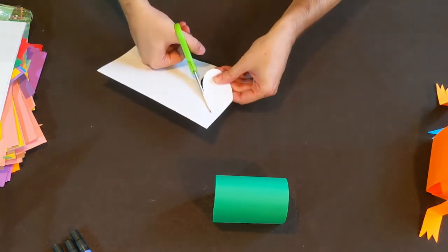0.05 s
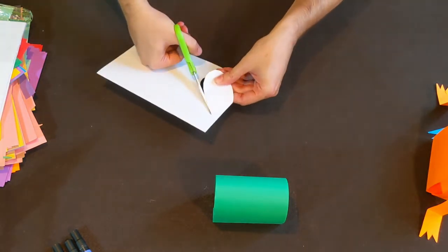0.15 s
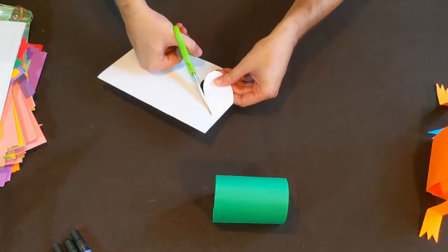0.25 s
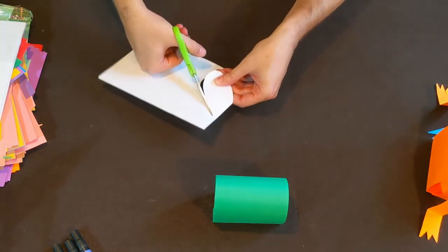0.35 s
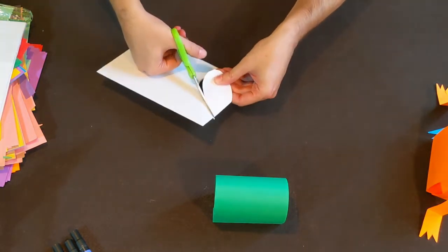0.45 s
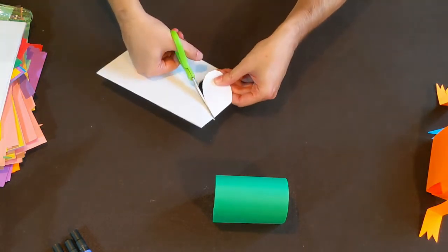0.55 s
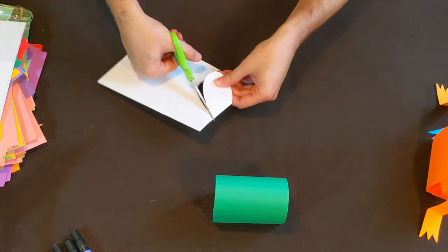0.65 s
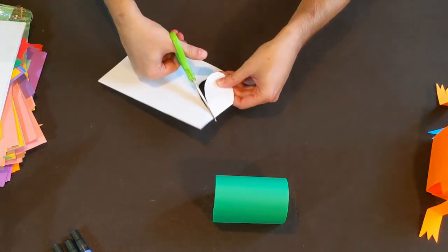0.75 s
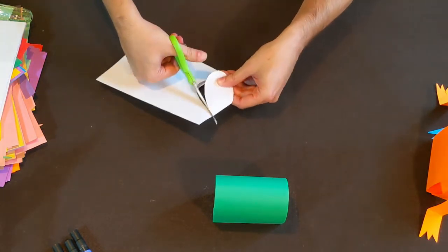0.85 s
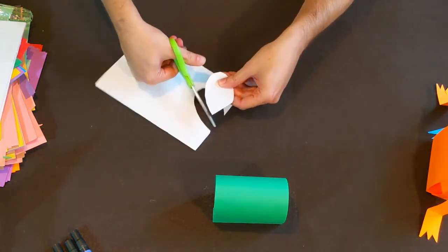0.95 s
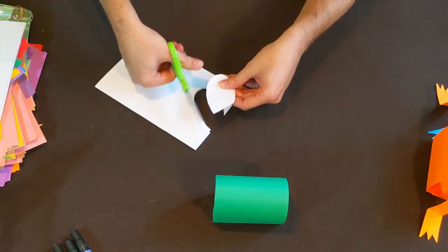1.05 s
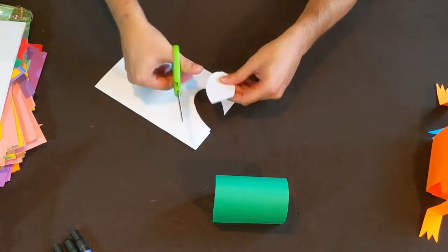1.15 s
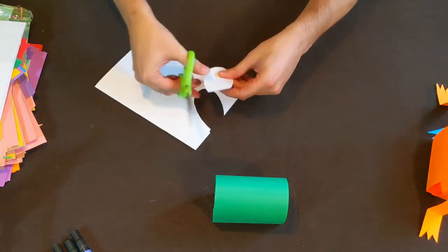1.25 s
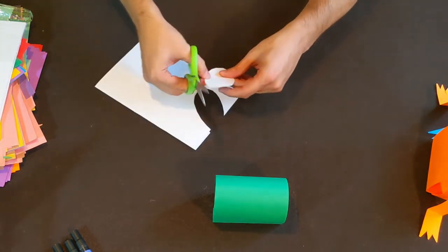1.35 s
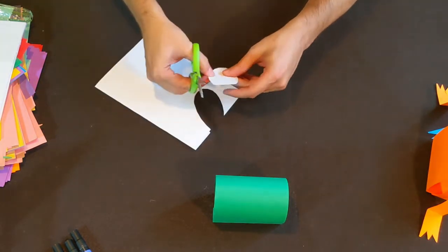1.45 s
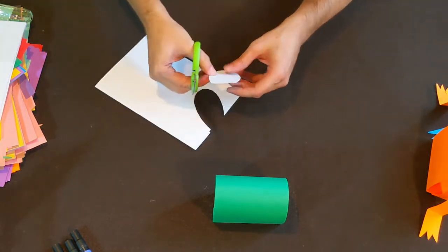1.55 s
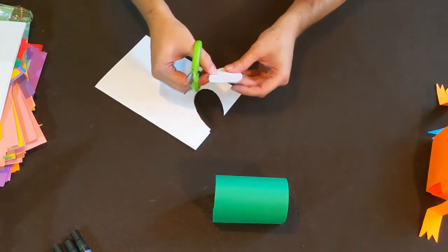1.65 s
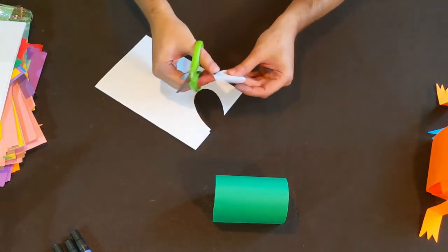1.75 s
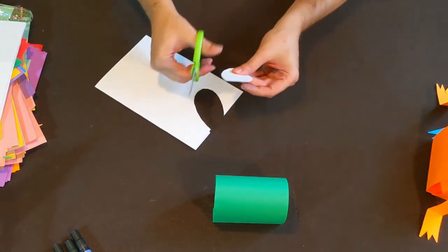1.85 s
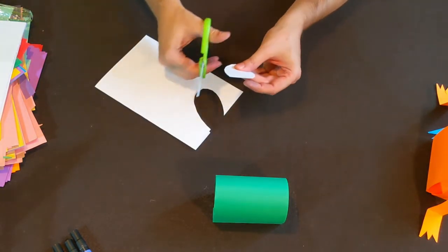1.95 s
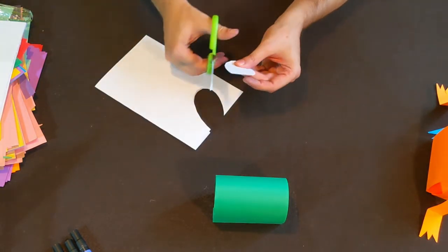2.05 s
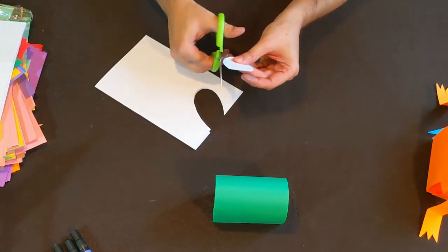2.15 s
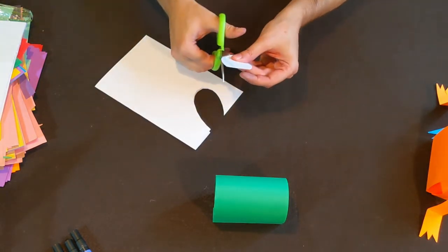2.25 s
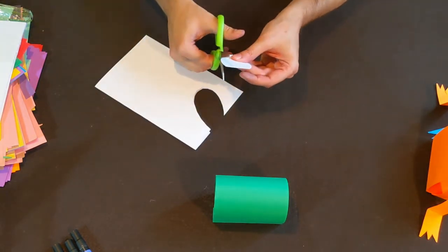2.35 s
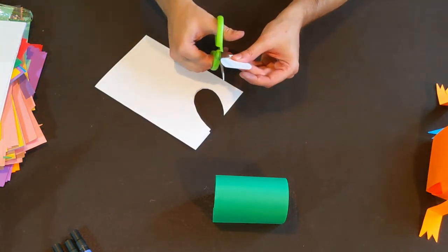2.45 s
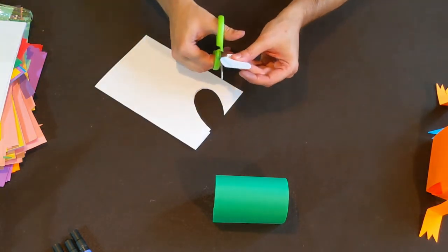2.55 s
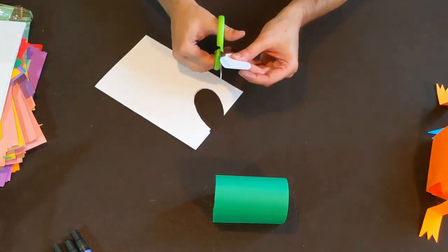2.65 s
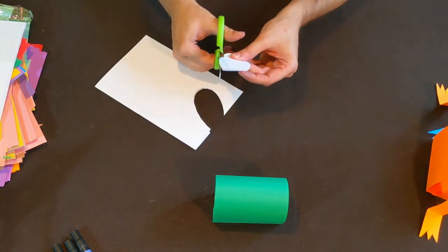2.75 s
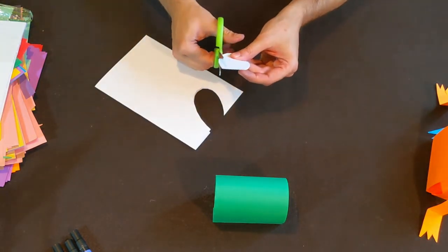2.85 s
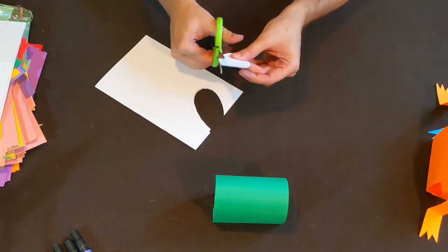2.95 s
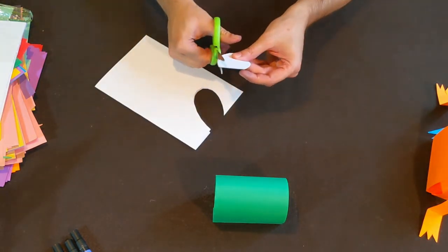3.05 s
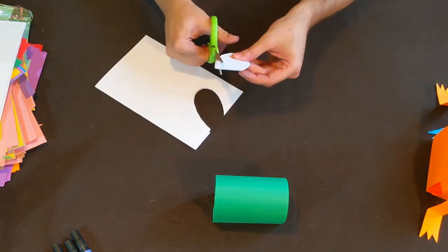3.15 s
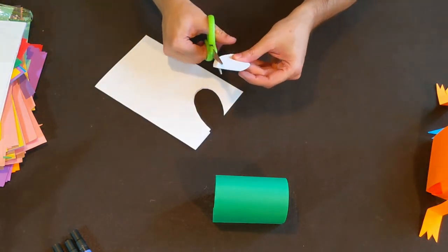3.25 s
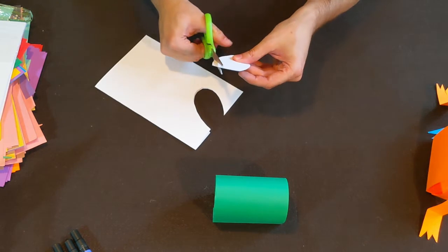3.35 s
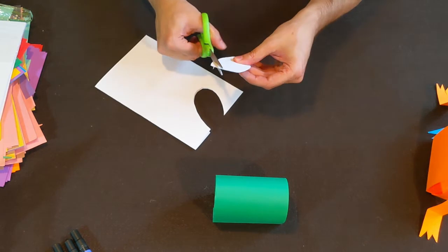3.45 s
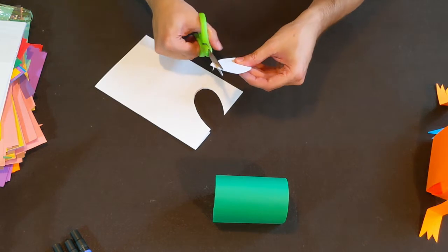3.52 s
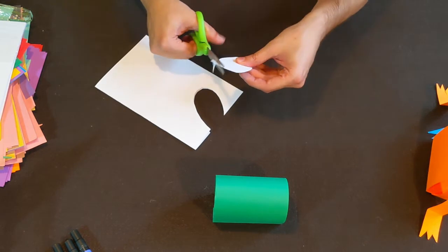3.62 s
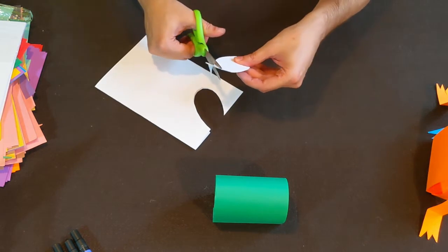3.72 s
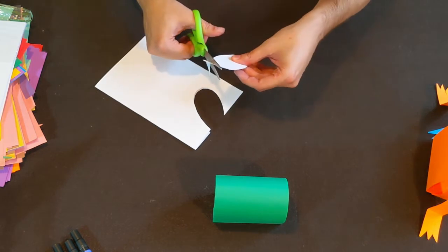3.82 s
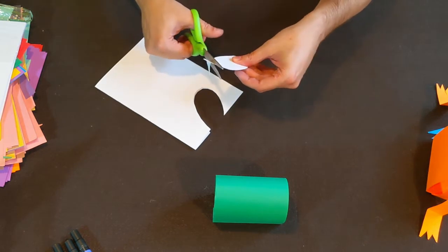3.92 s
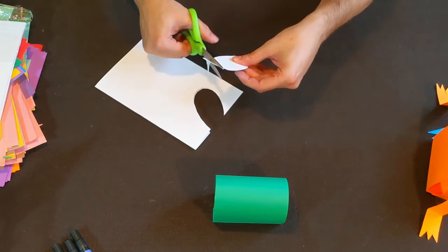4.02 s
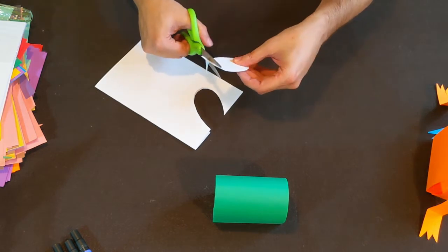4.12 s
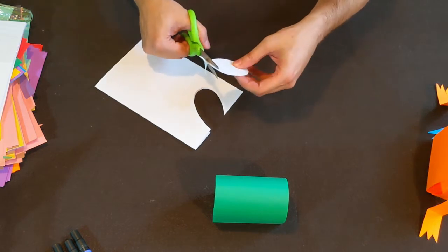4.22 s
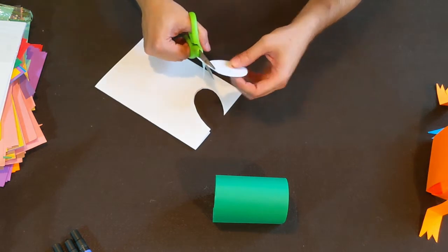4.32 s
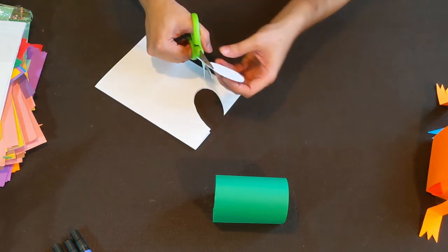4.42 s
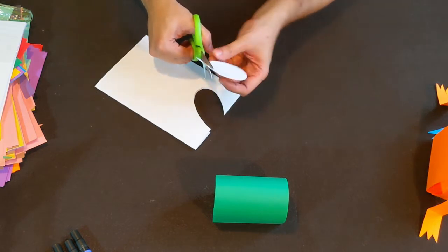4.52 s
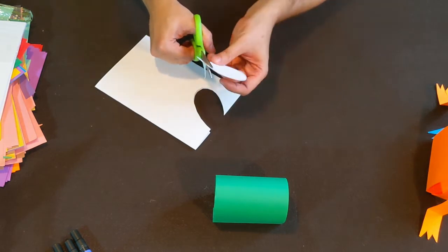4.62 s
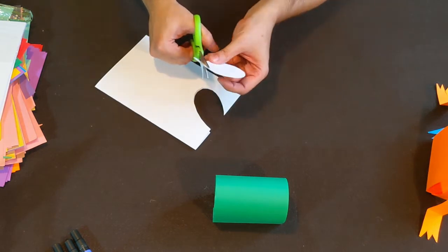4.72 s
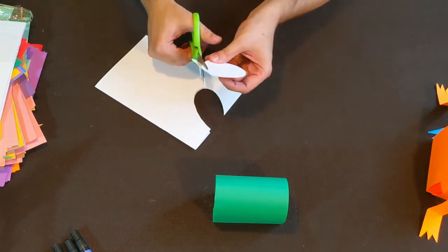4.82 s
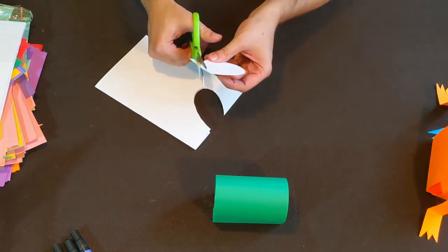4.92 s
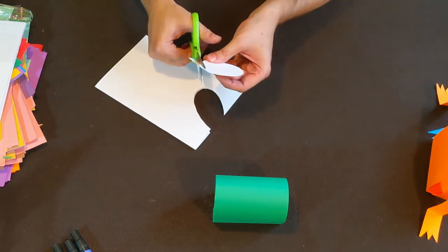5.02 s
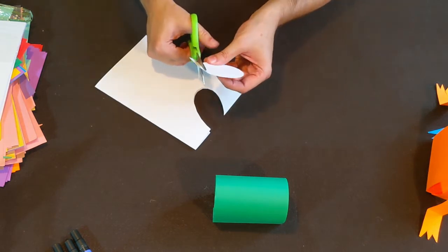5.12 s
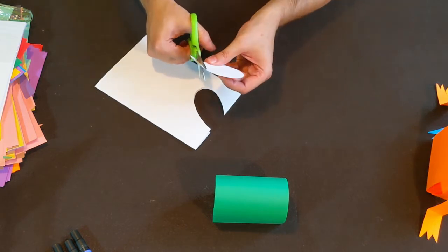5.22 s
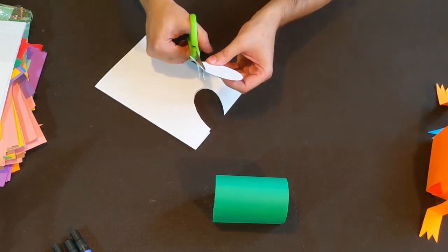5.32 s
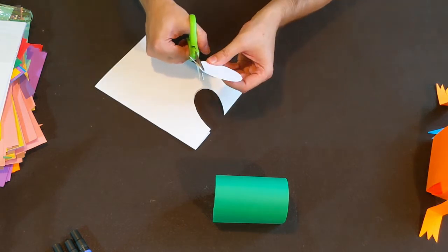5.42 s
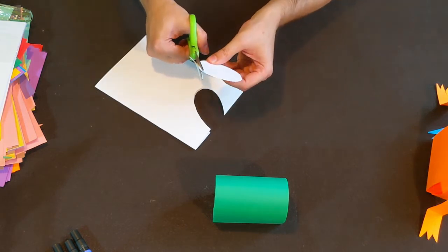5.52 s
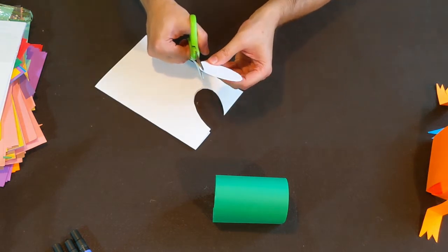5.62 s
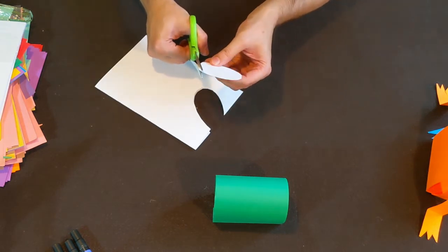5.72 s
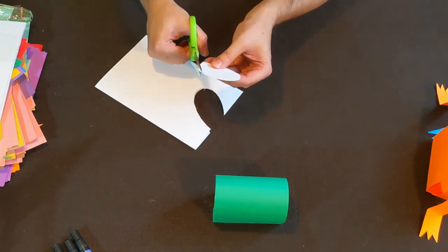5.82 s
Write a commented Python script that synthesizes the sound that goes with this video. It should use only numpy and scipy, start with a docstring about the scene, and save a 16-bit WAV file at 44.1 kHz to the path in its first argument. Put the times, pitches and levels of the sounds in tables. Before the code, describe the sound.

In a small, quiet, fairly dry room, an appliance hums and rushes softly, dipping after loud cuts. Scissors close through folded paper at once: crisp fibrous crunches with a papery thump at 0 to 0.2 s, steely scrapes around 0.4 s, more crunches at 0.56 to 0.65 s, another slide near 0.8 s, and a loud final crunch with a sharp blade clack at 0.94 s. Faint scrapes and ticks follow, a soft hollow knock at 1.4 s and a short high squeak at 1.7 s. Near quiet holds until 2.8 s, when tiny bright snips begin, growing to a clear snip and click at 3.5 s. A light slide comes at 3.7 s. From 4.1 to 5 s paper drags along a blade, thin, raspy and juddering, strongest near 4.6 s. Fine ticks continue, with a soft low puff at 5.2 s and a small closing click and faint squeak at 5.7 s.

```python
"""At a table in a small quiet room, scissors cut a shape out of folded paper.
Cuts are showers of fibre fractures that also drum on the sheet; sliding blades scrape by friction.
Faint bright snips trim the cut-out, a squeak is stick-slip, and paper drags along a blade as it is turned.
The blades snap shut, a soft knock and a low noisy puff sound; an appliance hums and rushes behind,
sinking after loud cuts.
"""
import sys
import numpy as np
from scipy import signal
from scipy.fft import rfft, irfft, next_fast_len
from scipy.io import wavfile
from scipy.ndimage import uniform_filter1d

SR = 44100
rng = np.random.default_rng(int(sys.argv[2]) if len(sys.argv) > 2 else 0)


def generate_wav(signal):
    """Clip the signal to [-1, 1] and save it as 16-bit WAV at the path in sys.argv[1]."""
    frames = np.transpose(np.atleast_2d(signal))
    scaled = np.clip(frames, -1, 1) * 32767
    pcm = np.round(scaled).astype(np.int16)
    wavfile.write(sys.argv[1], SR, pcm)


N = 258867

# Event levels are rms at full pressure, before reflections; pan_db is left over right.
# Spectra have only relative level: each coloured sound is brought to unit rms.

# appliance rush: frequency_hz, density_db (per Hz)
RUSH_SPECTRUM = [(25, -49), (90, -35), (150, -25), (190, -30), (230, -16), (330, -12), (500, -15.5),
                 (650, -19), (920, -19), (1400, -30), (2000, -29), (4900, -40.5), (7500, -48.5),
                 (15700, -56)]
# rise and fall of rush and hum, relative to its own median: time_s, level_db
BACKGROUND_SWELL = [(0.0, -45.5), (0.75, -48), (0.93, -55), (1.16, -53.5), (1.37, -48.5), (1.7, -49.5),
                    (2.17, -52.5), (3.24, -49), (3.69, -43.5), (4.38, -50), (4.74, -46.5), (5.87, -48)]
# hum lines, before waver and swell: frequency_hz, level_db (rms)
HUM_LINES = [(237, -63), (329.5, -52.5), (386, -64), (439.5, -60.5), (634, -69.5), (1781, -68)]
# likeness of the two sides of the rush: frequency_hz, coherence (0 to 1)
SIDE_COHERENCE = [(60, 0.77), (200, 0.99), (400, 0.57), (800, 0.26), (2000, 0.048), (6000, 0.059),
                  (14000, 0.13)]
# decay of the room: frequency_hz, t60_s
ROOM_DECAY = [(250, 0.18), (1000, 0.19), (3000, 0.26), (7000, 0.21), (14000, 0.17)]
# blades closing through the sheet: start_s, length_s, crunch_db, sheet_db, sheet_hz,
# tilt_db (per octave), fold_hz
CUT_EVENTS = [(-0.004, 0.015, -25, -19, 942, 0, 2600), (0.041, 0.085, -40, -35, 973, -4, 1150),
              (0.156, 0.026, -18.5, -25, 990, 0.5, 1500), (0.183, 0.024, -21, -31.5, 990, 2, 1850),
              (0.564, 0.024, -33.5, -32.5, 980, -5, 1400), (0.603, 0.024, -18.5, -26.5, 944, 3, 2200),
              (0.638, 0.02, -25, -23, 910, -1, 1850), (0.936, 0.0099, -17.5, -35, 950, 4, 2750)]
# snapping fibres: frequency_hz, density_db (per Hz)
CRUNCH_SPECTRUM = [(60, -49), (250, -35), (550, -6), (900, -6.5), (1400, -3.5), (2000, 0.5), (2900, -6.5),
                   (4000, -5), (5800, -8), (7600, -16.5), (10500, -14), (13000, -20), (16000, -30)]
# blade sliding on blade and paper: start_s, length_s, level_db, tilt_db (per octave), rasp_hz,
# pan_db, catch_db (spread of the catching)
SLIDE_EVENTS = [(0.365, 0.031, -30.5, 3, 2970, -0.5, 3.3), (0.404, 0.047, -33, 1, 2500, 3, 0),
                (0.784, 0.041, -32.5, 3, 4000, 3, 0.5), (0.835, .022, -33, 3, 4140, 5, 0),
                (1.132, 0.041, -49, 1.5, 6100, -1, -3), (1.241, 0.033, -49, -0.5, 5670, -1, 0),
                (2.241, 0.012, -58, -1.5, 2900, 1, 1.5), (3.651, 0.03, -41.5, 0.5, 4160, -3, 2),
                (3.69, 0.11, -45.5, 3.5, 4400, -2, 1), (4.149, 0.024, -48.5, 2, 5730, -3, 10),
                (5.685, 0.17, -58, 0.5, 1890, -7, 5)]
# sliding friction: frequency_hz, density_db (per Hz)
SLIDE_SPECTRUM = [(60, -45), (250, -4), (600, 4.5), (1000, 10.5), (1600, -1.5), (2500, 3), (3200, -1.5),
                  (4200, 0.5), (6000, -8.5), (7600, -11.5), (10300, -9), (13000, -20), (16000, -20.5)]
# blades snapping shut: start_s, level_db (of the crack), ring (ratio to the crack)
CLACK_EVENTS = [(0.9416, -17, 1.05), (0.951, -28, .8), (3.4904, -30.5, 0.09), (5.69, -44, .1)]
# crack of the closing blades: frequency_hz, density_db (per Hz)
CLACK_SPECTRUM = [(400, -28), (1000, -9), (3000, 7.5), (6000, 4), (8000, -13), (11000, -4.5), (16000, -9)]
# tips nibbling the cut-out: start_s, tip_db, blade_db, pan_db (of the tick), blade_hz, tick_hz
SNIP_EVENTS = [(1.142, -47, -67, -2, 6200, 10300), (1.188, -58.5, -81, -7, 6000, 12000),
               (1.494, -60.5, -67, -3, 4200, 10000), (1.563, -63, -60, -2, 3770, 10100),
               (1.759, -63, -62, -4, 5900, 10100), (1.907, -55, -63, -7.5, 3940, 10100),
               (2.808, -67, -51.5, -11, 5530, 11500), (2.828, -58.5, -46, -16, 5240, 12700),
               (2.862, -58.5, -46.5, -15, 5260, 11000), (2.879, -58, -46.5, -16, 5870, 10900),
               (2.914, -61, -51.5, -11, 5930, 13000), (2.956, -64, -58, -7, 5900, 11100),
               (3.082, -51, -44, -4, 5400, 14900), (3.113, -59, -58, -1, 5630, 14100),
               (3.216, -58, -45, -7, 5400, 12400), (3.232, -52.5, -46, -14.5, 5930, 12200),
               (3.357, -39.5, -39, -7, 5930, 12200), (3.419, -38, -41, -5.5, 5800, 12400),
               (3.488, -29.5, -34, -4, 5030, 12100), (3.659, -66, -43.5, -1, 4300, 12000),
               (4.179, -58, -69, -11, 5700, 12900), (4.245, -56.5, -53, -3, 4200, 10300),
               (4.972, -50, -51, -4, 5830, 10000), (4.986, -45, -49, 3, 6000, 14300),
               (5.177, -61, -58, -10, 5540, 14470), (5.258, -63, -52, -7, 5630, 15000),
               (5.32, -60, -55, -8, 4400, 14800), (5.346, -59, -53.5, -8, 3730, 12900),
               (5.394, -53.5, -57.5, -9, 4460, 12200), (5.512, -59, -68, -9, 4500, 12800),
               (5.545, -61, -70, -6, 4500, 12900), (5.638, -52.5, -66, -7, 5900, 12500),
               (5.688, -39.5, -51, -3.5, 4800, 10750), (5.755, -57.5, -60, -12, 5430, 13300)]
# tick at the tips: frequency_hz, density_db (per Hz)
TIP_SPECTRUM = [(3000, -44), (7500, -13), (9500, -3.5), (11000, 3), (12800, -1), (14000, 1), (16000, -15)]
# body of the blade ring: frequency_hz, density_db (per Hz)
BLADE_SPECTRUM = [(80, -52), (300, -14), (1000, -7.5), (2000, -10), (2800, -12.5), (3600, -13), (4200, 1.5),
                  (5200, -29.5), (6200, 4), (7300, -64), (10000, -42)]
# rubbing and sticking: start_s, length_s, pitch_hz, squeak_db, rub_db, grit (ratio to the tone)
SQUEAK_EVENTS = [(1.707, 0.0027, 2486, -25, -37, .1), (1.72, 0.016, 2581, -23, -42.5, 0.063),
                 (2.322, 0.013, 2700, -61, -55, 0.92), (2.424, 0.023, 2363, -57.5, -63, 1.1),
                 (5.686, 0.032, 2014, -50.5, -56, .7)]
# dull rub under a squeak: frequency_hz, density_db (per Hz)
RUB_SPECTRUM = [(60, -47), (130, -13.5), (230, 3.5), (550, 9.5), (1200, 1), (1800, -14.5), (3300, -38),
                (4300, -10.5), (5500, -35), (12000, -45)]
# turn of the dragging cut-out, before judder: time_s, upper_db, lower_db, lower_hz
DRAG_COURSE = [(4.071, -95, -88, 3300), (4.13, -61, -57.5, 3400), (4.18, -62, -55, 3780),
               (4.228, -62, -66, 3800), (4.243, -50, -67, 3800), (4.32, -59.5, -61, 3750),
               (4.41, -51.5, -56, 3750), (4.555, -59, -48.5, 3680), (4.583, -56, -45, 3650),
               (4.594, -44, -32.5, 3660), (4.645, -49, -43, 3700), (4.70, -51, -43.5, 3680),
               (4.754, -50, -41, 3630), (4.81, -53, -43.5, 3470), (4.835, -59, -51.5, 3500),
               (4.95, -62, -58.5, 3450), (5.22, -76, -63.5, 3450), (5.5, -88, -79, 3450)]
# rasp of the drag: frequency_hz, density_db (per Hz)
DRAG_SPECTRUM = [(100, -55), (900, 3.5), (1700, -1), (2550, 2.5), (3200, 3), (4150, -11), (4750, -20),
                 (5700, -5), (6600, -16), (9000, -16), (15000, -31)]
# soft noisy puff: frequency_hz, density_db (per Hz)
PUFF_SPECTRUM = [(30, -27), (90, -19), (140, 1), (200, -12), (450, -0.5), (620, -9), (820, -7.5),
                 (1500, -20), (3000, -24), (6000, -32), (12000, -54)]

# scatter off table and hands: (level over the direct sound dB, t60 s)
CUT_SCATTER, SNIP_SCATTER, SQUEAK_SCATTER = (4.6, 0.014), (3.3, 0.021), (-0.5, 0.13)
# wall tails over the direct sound
CUT_ROOM_DB, SNIP_ROOM_DB, SQUEAK_ROOM_DB = -7, -0.5, -12.5
CUTOFF_HZ = 15780
RUSH_DB = -50.0
# every cut: the edges graze the paper, bite, then run out; levels are relative to the bite
GRAZE_S, GRAZE_DB = 0.011, -10
BITE_RISE_S, BITE_FALL_S, BITE_FADE_DB = 0.006, 0.017, -3.5
RUN_OUT_DB, RUN_OUT_FALL_S = -5.5, 0.025
# the fold colours the crunch with a broad resonance; fibres give way in bunches
FOLD_SHARE, FOLD_WIDTH_HZ = 0.37, 2140
BUNCH_DB, BUNCHES_PER_S = 2.4, 550
RASP_WIDTH_HZ, RASP_SHARE = 830, 0.37
SLIDE_RISE_S, SLIDE_FADE_DB = 0.013, -1.5
# every slide trails off in a duller rub, its level relative to the slide
TRAIL_DB, TRAIL_FALL_S, TRAIL_TILT_DB = -9.5, 0.079, -2
CLACK_LENGTH_S, CLACK_RING_HZ, CLACK_WIDTH_HZ = 0.0017, 2900, 290
# the stiff little cut-out gives each tick a resonance
TICK_SHARE, TICK_WIDTH_HZ = 0.93, 2000
# the two blades ring a little apart, this share either side of the ring pitch
BLADE_SPLIT, RING_WIDTH_HZ, RING_SHARE = 0.061, 780, 1.3
KNOCK_S, KNOCK_HZ, KNOCK_DB = 1.393, 635, -42.5
KNOCK_RISE_S, KNOCK_HOLD_S, KNOCK_FALL_S = 0.0069, 0.024, 0.031
# a squeak is unsteady in pitch (as a share of it) and in level
SQUEAK_JITTER, JITTERS_PER_S = 0.03, 900
SQUEAK_SHUDDER_DB, SHUDDERS_PER_S = 2.0, 330
SQUEAK_WIDTH_HZ, GRIT_WIDTH_HZ = 560, 950
# the upper drag resonance sinks, the lower one carries an overtone, both waver
DRAG_UPPER_HZ, DRAG_SAG_HZ_PER_S, DRAG_WAVER_HZ = 4180, 240, 60.2
DRAG_UPPER_WIDTH_HZ, DRAG_LOWER_WIDTH_HZ = 380, 540
DRAG_OVERTONE_RATIO, DRAG_OVERTONE_DB = 1.55, -19.5
DRAG_RASP_DB, JUDDER_DB, JUDDERS_PER_S = 2.5, 2.5, 120
PUFF_S, PUFF_LENGTH_S, PUFF_DB = 5.225, 0.067, -43


def from_db(db):
    """Decibel law: amplitude gain grows tenfold every 20 dB."""
    return 10 ** (np.asarray(db) / 20)


def rms_one(x):
    """Normalisation: scale to unit rms."""
    return x / np.sqrt(np.mean(x ** 2) + 1e-20)


def at_hz(points, hz):
    """Interpolation of a table on a log-frequency axis."""
    f, value = np.transpose(points)
    return np.interp(np.log(np.maximum(hz, 1)), np.log(f), value)


def bins(x):
    """Frequencies of the discrete spectrum of x, in Hz."""
    return np.fft.rfftfreq(x.shape[-1], 1 / SR)


def colour(x, spectrum, tilt_db=0):
    """Linear filtering: weight x by a spectrum, tilted per octave above 500 Hz; rms 1."""
    hz = np.maximum(bins(x), 1)
    weight_db = at_hz(spectrum, hz) + tilt_db * np.log2(np.maximum(hz, 500))
    return rms_one(np.fft.irfft(rfft(x) * from_db(weight_db), x.shape[-1]))


def resonate(x, hz, width_hz):
    """Damped oscillator: a pole pair whose radius sets the bandwidth."""
    r = np.exp(-np.pi * width_hz / SR)
    return signal.lfilter([1, 0, -1], [1, -2 * r * np.cos(2 * np.pi * hz / SR), r * r], x)


def band(x, hz, width_hz):
    """Cascaded resonance: two equal oscillators give steep skirts; rms 1."""
    return rms_one(resonate(resonate(x, hz, width_hz), hz, width_hz))


def moving_resonance(hz, width_hz):
    """Narrow-band noise: a carrier following hz, with random slow quadratures; rms 1."""
    phase = 2 * np.pi * np.cumsum(hz) / SR
    return rms_one(drift(width_hz, N) * np.cos(phase) + drift(width_hz, N) * np.sin(phase))


def drift(rate, size):
    """Slow random fluctuation: straight lines between normal draws, rate of them per second."""
    steps = np.arange(size) * rate / SR
    return np.interp(steps, np.arange(size), rng.standard_normal(size))


def grains(per_s, spread_db, size=8192):
    """Shot noise: tiny impulses at random moments, with random signs and strengths."""
    born = rng.random(size) < per_s / SR
    sign = rng.choice([-1, 1], size)
    strength = from_db(spread_db * np.minimum(rng.exponential(1, size), 4))
    return born * sign * strength


def stroke(length, rise, fall, fade_db=0, size=8192):
    """Pressure envelope: it builds, changes by fade_db over its length, then decays exponentially."""
    t, length = np.arange(size) / SR, max(length, 0.001)
    building = np.sin(np.pi / 2 * np.minimum(t / rise, 1)) ** 2
    holding = from_db(fade_db * np.minimum(t / length, 1))
    return building * holding * np.exp(-np.maximum(t - length, 0) / fall)


def pressed(sound, press, level_db):
    """Amplitude modulation by pressure, with the given rms level at full pressure."""
    return from_db(level_db) * rms_one(sound * press) * np.sqrt(np.mean(press ** 2))


def add(track, s, sound, pan_db=0):
    """Superposition: sum a sound into the stereo track at time s, panned by level difference."""
    start = round(s * SR)
    first, last = max(start, 0), min(start + sound.shape[-1], N)
    track[:, first:last] += sound[:, first - start:last - start] * from_db([[pan_db / 2], [-pan_db / 2]])


def with_direct(echoes):
    """Interference: direct sound plus echoes ripple the spectrum but keep its broad balance."""
    size = echoes.shape[-1]
    ripple = 1 + rfft(echoes)
    broad_power = uniform_filter1d(np.abs(ripple) ** 2, size=size // 110, axis=1)
    ending = np.minimum(np.linspace(4, 0, size), 1) ** 2   # fades the last quarter
    return irfft(ripple / np.sqrt(broad_power)) * ending


def scatter(sound, near, size=8192):
    """Early reflection off table and hands: decaying echoes, new for each side and each call."""
    near_db, t60 = near
    decay = from_db(-60 * np.arange(size) / SR / t60)
    echoes = rms_one(rng.standard_normal((2, size)) * decay)
    response = with_direct(from_db(near_db) * echoes / np.sqrt(size))
    return signal.fftconvolve(sound[None], response, axes=1)


def room(x, tail_db, size=22050):
    """Reverberation: diffuse noise whose bands each decay exponentially at their own rate."""
    t = np.arange(size) / SR
    white = rng.standard_normal((2, size))
    centres, tail = np.array(ROOM_DECAY)[:, 0], 0
    for hz, t60 in ROOM_DECAY:
        share = at_hz(np.c_[centres, centres == hz], bins(white))
        tail = tail + irfft(rfft(white) * share) * from_db(-60 * t / t60)
    tail = rms_one(tail * np.minimum(t / 0.00065, 1))
    response = with_direct(from_db(tail_db) * tail / np.sqrt(size))
    return signal.fftconvolve(x, response, axes=1)[:, :N]


def background():
    """Partial coherence: a two-sided rush and wavering hum, whose set level sinks after loud cuts."""
    level_db = np.interp(np.arange(N) / SR, *np.transpose(BACKGROUND_SWELL))
    swell = from_db(level_db - np.median(level_db))
    white = rng.standard_normal((2, next_fast_len(N, True)))
    mid, side = rfft(white)
    alike = np.clip(at_hz(SIDE_COHERENCE, bins(white)), 0, 1)
    both_sides = np.sqrt(1 + alike) * mid + np.sqrt(1 - alike) * side * [[1], [-1]]
    rush = colour(irfft(both_sides), RUSH_SPECTRUM)[:, :N]
    hum = 0
    for hz, line_db in HUM_LINES:
        phase = 2 * np.pi * np.cumsum(hz + 1.49 * drift(12, N)) / SR
        hum = hum + np.sqrt(2) * from_db(line_db + 2.7 * drift(9, N)) * np.sin(phase)
    return swell * (from_db(RUSH_DB) * rush + hum)


def cuts():
    """Fracture noise: fibres snap in bunches, and the same jolts excite resonances of the sheet."""
    out = np.zeros((2, N))
    for s, length, crunch_db, sheet_db, sheet_hz, tilt_db, fold_hz in CUT_EVENTS:
        fibres = grains(per_s=7300, spread_db=2.5)
        fibres = fibres * from_db(BUNCH_DB * drift(BUNCHES_PER_S, len(fibres)))
        bite = stroke(length, BITE_RISE_S, BITE_FALL_S, BITE_FADE_DB)
        run_out = from_db(RUN_OUT_DB) * stroke(length, BITE_RISE_S, RUN_OUT_FALL_S)
        press = np.maximum(bite, run_out)
        fold = band(fibres, fold_hz, FOLD_WIDTH_HZ)
        crunch = colour(fibres, CRUNCH_SPECTRUM, tilt_db) + FOLD_SHARE * fold
        crunch = pressed(crunch, press, crunch_db)
        drumming = rms_one(resonate(resonate(fibres, sheet_hz * 0.9, 230), sheet_hz * 0.99, 320))
        overtone = band(fibres, sheet_hz * 1.207, 187)
        sheet = pressed(drumming + 0.23 * overtone, bite, sheet_db)
        graze = colour(grains(per_s=5000, spread_db=-11.5), CRUNCH_SPECTRUM, tilt_db)
        graze = pressed(graze, stroke(GRAZE_S, GRAZE_S, BITE_FALL_S), crunch_db + GRAZE_DB)
        add(out, s - GRAZE_S, scatter(graze, CUT_SCATTER))
        add(out, s, scatter(crunch + sheet, CUT_SCATTER), pan_db=2.0)
    return out


def slides():
    """Sliding friction: asperities of steel and paper catch, rasp at one pitch and trail off dully."""
    out = np.zeros((2, N))
    for s, length, level_db, tilt_db, rasp_hz, pan_db, catch_db in SLIDE_EVENTS:
        asperities = grains(per_s=9000, spread_db=0.5)
        asperities = asperities * from_db(catch_db * drift(185, len(asperities)))
        rasp = band(asperities, rasp_hz, RASP_WIDTH_HZ)
        press = stroke(length, rise=SLIDE_RISE_S, fall=0.016, fade_db=SLIDE_FADE_DB)
        scrape = colour(asperities, SLIDE_SPECTRUM, tilt_db) + RASP_SHARE * rasp
        scrape = pressed(scrape, press, level_db)
        trail = colour(grains(per_s=7000, spread_db=5.5), SLIDE_SPECTRUM, TRAIL_TILT_DB)
        trail_press = stroke(0.016, rise=0.0051, fall=TRAIL_FALL_S)
        trail = pressed(trail, trail_press, level_db + TRAIL_DB)
        add(out, s, scatter(scrape, CUT_SCATTER), pan_db)
        add(out, s + length, scatter(trail, CUT_SCATTER))
    return out


def closing():
    """Impact: the blades snap shut in a dry crack that excites a brief ring of the steel."""
    out = np.zeros((2, N))
    for s, level_db, ring in CLACK_EVENTS:
        crack = colour(grains(per_s=12000, spread_db=8.5), CLACK_SPECTRUM)
        crack = pressed(crack, stroke(CLACK_LENGTH_S, rise=0.0003, fall=0.0008), level_db)
        steel = band(crack, CLACK_RING_HZ, CLACK_WIDTH_HZ) * crack.std()
        add(out, s, scatter(crack + ring * steel, SNIP_SCATTER))
    return out


def snips():
    """Impulse excitation: fibres snapping at the tips tick brightly and ring both blades briefly."""
    out = np.zeros((2, N))
    press = stroke(0.0083, rise=0.0016, fall=0.0055, fade_db=2.5)
    for s, tip_db, blade_db, pan_db, blade_hz, tick_hz in SNIP_EVENTS:
        fibres = grains(per_s=2200, spread_db=0.0)
        tick = colour(fibres, TIP_SPECTRUM) + TICK_SHARE * band(fibres, tick_hz, TICK_WIDTH_HZ)
        lower_blade = band(fibres, blade_hz * (1 - BLADE_SPLIT), RING_WIDTH_HZ)
        upper_blade = band(fibres, blade_hz * (1 + BLADE_SPLIT), RING_WIDTH_HZ)
        blades = rms_one(lower_blade - upper_blade)
        ring = colour(fibres, BLADE_SPECTRUM) + RING_SHARE * blades
        add(out, s, scatter(pressed(tick, press, tip_db), SNIP_SCATTER), pan_db)
        add(out, s, scatter(pressed(ring, press, blade_db), SNIP_SCATTER), pan_db=-0.5)
    return out


def knock():
    """Single mode of vibration: a soft hollow knock as the hand turns the scissors over."""
    out = np.zeros((2, N))
    press = stroke(KNOCK_HOLD_S, KNOCK_RISE_S, KNOCK_FALL_S)
    note = np.sin(2 * np.pi * KNOCK_HZ * np.arange(len(press)) / SR)
    contact = colour(grains(per_s=4500, spread_db=-5.0), SLIDE_SPECTRUM, tilt_db=-2.0)
    add(out, KNOCK_S, pressed(note + 0.27 * contact, press, KNOCK_DB)[None])
    return out


def squeaks():
    """Stick-slip friction: an unsteady tone with grit, over a dull rub."""
    out = np.zeros((2, N))
    for s, length, hz, squeak_db, rub_db, grit in SQUEAK_EVENTS:
        press = stroke(length, rise=0.002, fall=0.003)
        pitch_hz = hz * (1 + SQUEAK_JITTER * drift(JITTERS_PER_S, len(press)))
        shudder = from_db(SQUEAK_SHUDDER_DB * drift(SHUDDERS_PER_S, len(press)))
        tone = np.sin(2 * np.pi * np.cumsum(pitch_hz) / SR) * shudder
        gritty = band(grains(per_s=3900, spread_db=-6.0), hz, GRIT_WIDTH_HZ)
        squeak = band(tone, hz, SQUEAK_WIDTH_HZ) + grit * gritty
        rub = colour(grains(per_s=3200, spread_db=5.0), RUB_SPECTRUM)
        rub = pressed(rub, stroke(length, rise=0.0044, fall=0.042), rub_db)
        add(out, s, scatter(pressed(squeak, press, squeak_db), SQUEAK_SCATTER), pan_db=3.0)
        add(out, s, scatter(rub, SQUEAK_SCATTER))
    return out


def drag():
    """Friction-driven resonance: paper judders along steel, one resonance sinking, one following the turn."""
    t = np.arange(N) / SR
    s, *columns = np.transpose(DRAG_COURSE)
    upper_db, lower_db, lower_hz = [np.interp(t, s, column) for column in columns]
    upper, lower = from_db(upper_db), from_db(lower_db)
    upper_hz = DRAG_UPPER_HZ - DRAG_SAG_HZ_PER_S * (t - s[0]) + DRAG_WAVER_HZ * drift(45, N)
    lower_hz = lower_hz + DRAG_WAVER_HZ * drift(45, N)
    overtone_hz = DRAG_OVERTONE_RATIO * lower_hz
    singing = upper * moving_resonance(upper_hz, DRAG_UPPER_WIDTH_HZ)
    singing = singing + lower * moving_resonance(lower_hz, DRAG_LOWER_WIDTH_HZ)
    overtone = moving_resonance(overtone_hz, DRAG_LOWER_WIDTH_HZ)
    singing = singing + lower * from_db(DRAG_OVERTONE_DB) * overtone
    slips = grains(per_s=2700, spread_db=3.0, size=next_fast_len(N, True))
    effort = np.hypot(upper, lower)
    # the rasp follows the effort with a compressed range
    rasp_level = from_db(DRAG_RASP_DB) * effort.mean() * (effort / effort.mean()) ** 0.42
    rasp = colour(slips, DRAG_SPECTRUM)[:N] * rasp_level
    touching = (t > s[0]) * (t < s[-1])
    judder = from_db(JUDDER_DB * drift(JUDDERS_PER_S, N)) * touching
    return scatter((singing + rasp) * judder, CUT_SCATTER)[:, :N]


def puff():
    """Shaped noise: a soft, low, noisy puff that swells and dies away gradually."""
    out = np.zeros((2, N))
    noise = colour(grains(per_s=9000, spread_db=3.0), PUFF_SPECTRUM)
    envelope = stroke(PUFF_LENGTH_S, rise=0.025, fall=0.087)
    add(out, PUFF_S, pressed(noise, envelope, PUFF_DB)[None])
    return out


def scene():
    """Superposition: scissors and paper reverberate in the room, over the appliance."""
    cutting = room(cuts() + slides() + closing() + drag(), CUT_ROOM_DB)
    trimming = room(snips(), SNIP_ROOM_DB)
    rubbing = room(squeaks(), SQUEAK_ROOM_DB)
    return background() + cutting + trimming + knock() + rubbing + puff()


def record(dry):
    """Stereo balance and band limit: the right is brighter in the high treble; the cutoff is steep."""
    hz = bins(dry)
    # left over right: (frequency Hz, level dB)
    balance = [(900, 0), (2000, 1.5), (4000, 0.5), (6500, 0.5), (9000, -2.0), (11500, -7.5), (14000, -9.5)]
    sides = from_db(np.outer([1, -1], at_hz(balance, hz) / 2))
    band_limit = 1 / np.sqrt(1 + (hz / CUTOFF_HZ) ** 400)
    return np.fft.irfft(rfft(dry) * band_limit * sides, N)


dry = scene()
out = record(dry)
generate_wav(out)
```